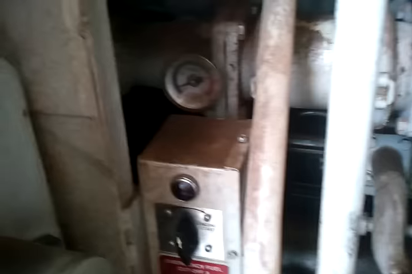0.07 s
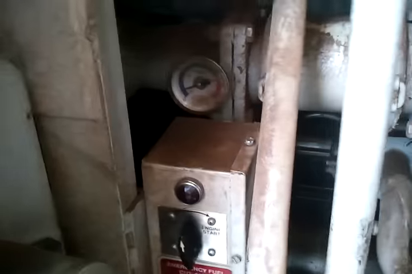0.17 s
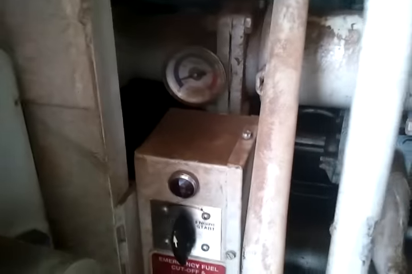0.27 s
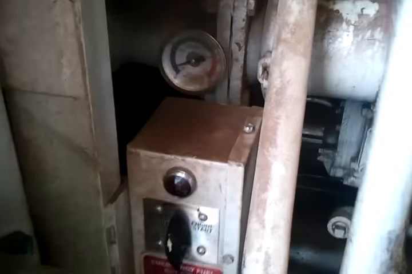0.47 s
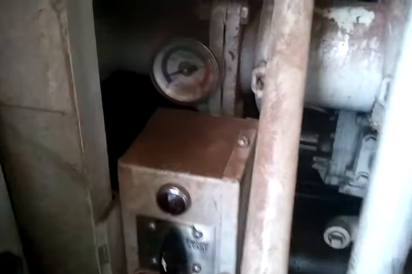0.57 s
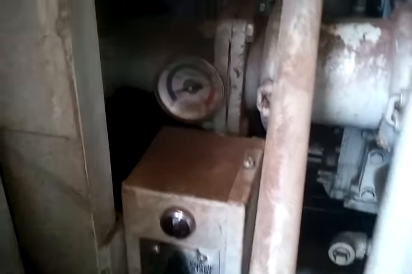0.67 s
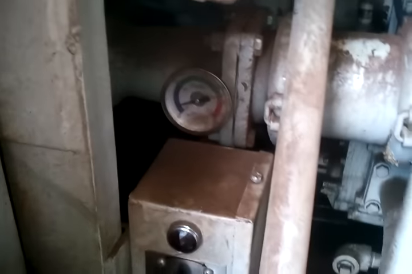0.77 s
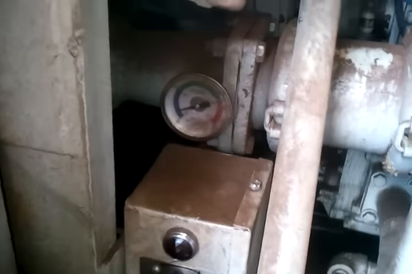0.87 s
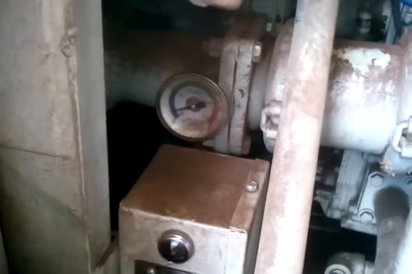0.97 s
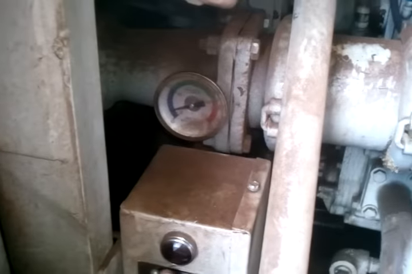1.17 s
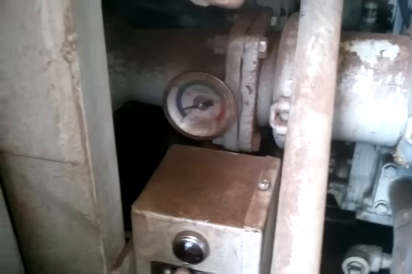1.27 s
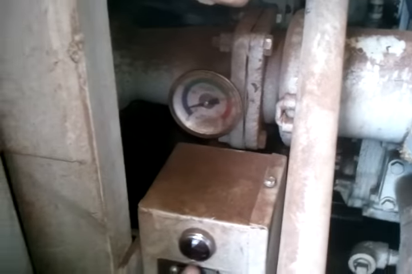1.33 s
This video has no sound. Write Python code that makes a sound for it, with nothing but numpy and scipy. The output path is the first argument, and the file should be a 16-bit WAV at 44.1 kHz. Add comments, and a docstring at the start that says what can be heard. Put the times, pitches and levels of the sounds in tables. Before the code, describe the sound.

After a brief silence, a diesel locomotive engine room throbs low with steady clatter and hiss; a dull thud, then a valve puff, quick ringing knocks and stronger air hiss, close mono microphone in a cramped metal compartment.

```python
"""A short silence, then the engine room of a diesel locomotive: diesel and a faster auxiliary shaft throb and beat
as sums of shaft orders, over rumble (coloured noise) and steady clatter and hiss (noise pulsing with the strokes,
ringing panels, faint whistles). A dull thud (decaying modes), then a valve snaps open with a puff (noise burst);
knocks ring the casing (decaying modes) and a stronger hiss builds up (noise through casing resonances).
Mono: both channels are equal."""
import sys
import numpy as np
from scipy import signal
from scipy.io import wavfile
from scipy.ndimage import uniform_filter1d

SR = 44100
rng = np.random.default_rng(int(sys.argv[2]) if len(sys.argv) > 2 else 0)


def elevation(decibels):
    """Turn decibel levels (scalar or array-like) into linear amplitude ratios."""
    levels = np.asarray(decibels, float)
    return 10 ** (levels / 20)


def dump_mix(stems):
    """Bounce the given channels to the path in sys.argv[1] as a 16-bit WAV at rate SR."""
    frames = np.atleast_2d(stems).T  # one column per channel
    limited = np.clip(frames, -1, 1)  # hard clip at full scale
    pcm = np.round(limited * 32767).astype(np.int16)
    wavfile.write(sys.argv[1], SR, pcm)


N = 128772  # samples

# mic input
OPEN_S, OPEN_RISE_S = .2043, .003

# diesel: cycle rate, moment of one firing
DIESEL_HZ, DIESEL_FIRES_S = 6.252, .0375
# diesel orders: (multiple of cycle rate [1], mean level [dB rms])
DIESEL_ORDERS = [(4, -59), (6, -58), (8, -33), (11, -59), (12, -55), (14, -57), (16, -38), (18, -55),
                 (22, -50), (24, -56), (28, -59), (32, -58), (33, -57), (61, -61)]
# auxiliary machine: shaft rate, moment of one stroke
AUX_HZ, AUX_STROKE_S = 15.894, .0027
# auxiliary orders: (multiple of shaft rate [1], mean level [dB rms])
AUX_ORDERS = [(2, -56), (3, -45), (5, -55), (6, -42), (7, -53), (8, -60), (9, -46), (10, -51), (11, -58),
              (12, -53), (13, -53), (14, -58), (16, -48), (19, -53), (20, -57), (21, -53), (23, -50),
              (24, -60), (26, -57), (27, -56), (44, -56), (47, -60), (50, -60), (56, -52), (58, -62),
              (60, -61), (62, -60), (78, -59), (87, -62), (92, -60), (93, -54), (96, -60), (100, -62),
              (107, -60), (108, -59), (111, -59), (114, -59), (116, -59), (119, -61), (122, -59)]
SCATTER_ABOVE_HZ = 150  # above this, orders arrive by many paths, in random phase
# unsteadiness of an order at 100 Hz, grows with pitch; top rate of the wavering
WAVER_AT_100HZ_DB, WANDER_AT_100HZ_RAD, WAVER_TOP_HZ = .9, .07, 5

# rumble spectrum shape: (frequency [Hz], relative density [dB per Hz])
RUMBLE_COLOUR = [(12, -30), (22, -4), (40, 2.5), (75, -7), (150, -0.5), (185, -7.5), (220, -3), (268, -9),
                 (285, -4), (340, -8.5), (395, -3.5), (435, -6.5), (470, -14), (600, -38)]
RUMBLE_DB = -43.5

# clatter spectrum shape: (frequency [Hz], relative density [dB per Hz])
CLATTER_COLOUR = [(260, -33), (450, -16.5), (536, -10), (585, -14.5), (680, -6.5), (841, -9.5), (904, -10),
                  (1050, -11.5), (1210, -8), (1360, -9.5), (1480, -4.5), (1660, -5.5), (1920, -2.5),
                  (2100, -4), (2280, -6.5), (2460, -12), (2890, -17.5), (3250, -15), (5320, -19.5),
                  (6240, -14), (7990, -19.5), (9650, -17.5), (11800, -23.5), (13500, -33), (14600, -42)]
# clatter pulsing with the strokes: (order of auxiliary shaft [1], depth [0-1])
STROKE_DEPTH = [(3, 0.09), (5, 0.02), (6, 0.09)]
# clatter noise before pulsing: (time [s], level below split [dB], level above split [dB])
CLATTER_LEVEL = [(.2, -35.5, -39.5), (.4, -37.5, -41), (.8, -36.5, -42), (1.1, -38, -42.5), (1.5, -37, -43),
                 (1.9, -37.5, -42.5), (2.9, -35.5, -42)]
SPLIT_HZ = 3000
TREBLE_STROKE_SHARE = 0.29  # of the depth below the split
# panel resonances: (frequency [Hz], width [Hz], level before PANEL_GAIN [dB])
PANEL_MODES = [(1652, 16, -53), (1812, 12, -51), (1905, 14, -51), (1952, 10, -49), (2210, 14, -53),
               (2313, 12, -53)]
# gain of the ringing panels: (time [s], gain [dB])
PANEL_GAIN = [(.2, -0.5), (.5, 2), (.9, 2.5), (1.3, -0.5), (1.9, -0.5), (2.9, -7)]
# faint treble whistles: (frequency [Hz], width [Hz], level re WHISTLE_DB [dB])
WHISTLES = [(3264, 210, -2), (6100, 51, 1), (6630, 150, 5.5), (8200, 50, -7.5), (8550, 220, -13)]
WHISTLE_DB = -57.5

THUD_S, THUD_RISE_S = 1.525, 0.022
# thud modes: (frequency [Hz], amplitude before rise and decay [dB], t60 [s])
THUD_MODES = [(153, -34.5, .5), (212, -35, 0.44), (315, -36.5, 0.33), (379, -35.5, .5)]

PUFF_S, PUFF_RISE_S, PUFF_T60_S, PUFF_DB = 1.989, .006, .11, -35.5
PUFF_HOLD_S = .022  # start to decay, rise included
# puff spectrum shape: (frequency [Hz], relative density [dB per Hz])
PUFF_COLOUR = [(2500, -30), (3300, -8), (3900, 2.5), (4600, -7), (5500, 3), (7500, -3), (9000, -3),
               (10500, -10), (11800, 3), (13000, -12), (14000, -30)]

# knocks: (time [s], level before KNOCK_GAIN_DB [dB])
KNOCKS = [(1.999, -24), (2.1394, -21), (2.2398, -32), (2.3294, -18.5), (2.419, -31), (2.5077, -21.5),
          (2.5641, -24.5), (2.6234, -21), (2.6853, -20), (2.77, -18), (2.8492, -23), (2.8994, -22)]
KNOCK_RISE_S, KNOCK_T60_S = 0.0085, 0.2  # rise is a time constant
KNOCK_SPREAD_DB, KNOCK_GAIN_DB = 3.5, -7.5
# casing resonances: (frequency [Hz], width [Hz], relative level [dB])
CASING_MODES = [(1335, 12, -14), (1599, 14, -10), (1701, 14, -11), (1830, 10, -5), (2073, 12, -10),
                (2095, 12, -9), (2191, 12, -6), (2638, 12, -16)]

# air hiss spectrum shape: (frequency [Hz], relative density [dB per Hz])
AIR_COLOUR = [(250, -40), (400, -3), (700, -17), (1250, -10), (2100, -9), (2600, -9), (3300, -4),
              (4500, -7.5), (6000, -4), (8000, -9.5), (10000, -9), (12700, -25), (14500, -38)]
# air hiss without casing: (time [s], level [dB])
AIR_LEVEL = [(2.04, -62), (2.11, -46), (2.15, -38), (2.22, -40), (2.4, -39), (2.6, -38), (2.75, -38),
             (2.92, -39)]
AIR_CASING_GAIN_DB = -2.5


def evened(x):
    """Scales to rms 1."""
    return x / np.sqrt(np.mean(x ** 2) + 1e-20)


def slow(top_hz):
    """Slow random wave of rms 1: sines of random phase up to top_hz."""
    t = np.arange(0, N + 256, 256) / SR
    wave = np.zeros(len(t))
    for hz in top_hz * np.geomspace(.08, 1, num=12):
        wave += np.sin(2 * np.pi * (hz * t + rng.random())) / np.sqrt(hz)
    return np.interp(np.arange(N) / SR, t, evened(wave))


def noise(colour, patch_db, band_db, flicker_db):
    """Coloured noise of rms 1 with broad short patches, narrow lasting bands and a shared flicker."""
    frames, hz = N // 256 + 5, np.fft.rfftfreq(1024, 1 / SR)
    # arrays are (frequency bin, frame)
    real, imag, p, q = rng.standard_normal((frames, len(hz), 4)).T
    patches = evened(uniform_filter1d(uniform_filter1d(p, size=12, axis=0), size=10, axis=1))
    bands = evened(uniform_filter1d(uniform_filter1d(q, size=2, axis=0), size=50, axis=1))
    flicker = evened(uniform_filter1d(rng.standard_normal(frames), size=8))
    colour_hz, colour_db = np.transpose(colour)
    shape_db = np.interp(np.log(hz + 1), np.log(colour_hz + 1), colour_db, left=-90, right=-90)[:, None]
    level_db = shape_db + patch_db * patches + band_db * bands + flicker_db * flicker
    spectrum = (real + 1j * imag) * elevation(level_db)
    return evened(signal.istft(spectrum, nperseg=1024, noverlap=768)[1][:N])


def ringing(modes, waver_db):
    """Noise through narrow resonances, each swelling and fading on its own by waver_db rms."""
    out, t = np.zeros(N), np.arange(N) / SR
    for hz, width_hz, db in modes:
        pole = np.exp(-np.pi * width_hz / SR)
        white = rng.standard_normal(N) + 1j * rng.standard_normal(N)
        low = signal.lfilter([1 - pole], [1, -pole], white)
        band = evened((low * np.exp(2j * np.pi * hz * t)).real)  # shifted up to hz
        out += elevation(db + waver_db * slow(4.08)) * band
    return out


def shaft(rate_hz, stroke_s, orders):
    """Suction pulses of a turning shaft as a sum of slightly wavering orders."""
    turns = rate_hz * (np.arange(N) / SR - stroke_s)
    out = np.zeros(N)
    for order, db in orders:
        order_hz = order * rate_hz
        loose = np.sqrt(order_hz / 100)
        scatter = 2 * np.pi * rng.random() * (order_hz > SCATTER_ABOVE_HZ)
        phase = scatter + WANDER_AT_100HZ_RAD * loose * slow(WAVER_TOP_HZ)
        level = elevation(db + WAVER_AT_100HZ_DB * min(loose, 2) * slow(WAVER_TOP_HZ))
        out -= np.sqrt(2) * level * np.cos(2 * np.pi * order * turns + phase)
    return out


def rumble():
    """Low coloured noise of flickering level."""
    return elevation(RUMBLE_DB) * noise(RUMBLE_COLOUR, patch_db=0.5, band_db=1.0, flicker_db=2.5)


def clatter():
    """Valve gear, gears and fans: broad noise pulsing with the strokes, ringing panels, faint whistles."""
    t = np.arange(N) / SR
    beat = np.zeros(N)
    for order, depth in STROKE_DEPTH:
        beat += depth * np.cos(2 * np.pi * (order * AUX_HZ * t + rng.random()))
    level_s, low_db, high_db = np.transpose(CLATTER_LEVEL)
    panels = elevation(np.interp(t, *np.transpose(PANEL_GAIN))) * ringing(PANEL_MODES, waver_db=1.5)
    body = noise(CLATTER_COLOUR, patch_db=0.7, band_db=1.0, flicker_db=.5)
    low = signal.oaconvolve(body, signal.firwin(255, SPLIT_HZ, fs=SR), "same")
    low_part = elevation(np.interp(t, level_s, low_db)) * evened(low)
    high_part = elevation(np.interp(t, level_s, high_db)) * evened(body - low)
    out = (1 + beat) * (low_part + panels)
    out += (1 + TREBLE_STROKE_SHARE * beat) * high_part
    return out + elevation(WHISTLE_DB) * ringing(WHISTLES, waver_db=0)


def thud():
    """One dull bump on a panel: decaying modes under a linear rise."""
    t = np.clip(np.arange(N) / SR - THUD_S, 0, None)
    ring = sum(elevation(db - 60 * t / t60_s) * np.sin(2 * np.pi * hz * t) for hz, db, t60_s in THUD_MODES)
    return np.minimum(t / THUD_RISE_S, 1) * ring


def puff():
    """Short noise burst as the valve snaps open: rise, hold, exponential decay."""
    t = np.arange(N) / SR - PUFF_S
    rise = np.clip(t / PUFF_RISE_S, 0, 1)
    decay = elevation(-60 * np.clip(t - PUFF_HOLD_S, 0, 1) / PUFF_T60_S)
    return elevation(PUFF_DB) * rise * decay * noise(PUFF_COLOUR, patch_db=1, band_db=2, flicker_db=0)


def knocks():
    """Each knock rings the casing modes in its own mix, slightly detuned."""
    out, t = np.zeros(N + SR), np.arange(SR // 4) / SR
    hz, _, mode_db = np.transpose(CASING_MODES)
    luck = rng.standard_normal((len(KNOCKS), 3, len(hz)))
    shape = (1 - np.exp(-t / KNOCK_RISE_S)) * elevation(-60 * t / KNOCK_T60_S)
    for (start_s, db), (mix, detune, phase) in zip(KNOCKS, luck):
        cycles = np.outer(hz * (1 + 0.0044 * detune), t) + phase[:, None]
        ring = elevation(mode_db + KNOCK_SPREAD_DB * mix) @ np.sin(2 * np.pi * cycles)
        out[round(start_s * SR):][:len(t)] += elevation(db + KNOCK_GAIN_DB) * shape * evened(ring)
    return out[:N]


def air():
    """Hiss that builds up after the valve opens and rings the casing."""
    level_s, level_db = np.transpose(AIR_LEVEL)
    hiss = noise(AIR_COLOUR, patch_db=.6, band_db=1.5, flicker_db=.6)
    casing = elevation(AIR_CASING_GAIN_DB) * ringing(CASING_MODES, waver_db=2.0)
    level = elevation(np.interp(np.arange(N) / SR, level_s, level_db, left=-120))
    return level * (hiss + casing)


def scene():
    """All sources at one microphone, on two equal channels."""
    mono = shaft(DIESEL_HZ, DIESEL_FIRES_S, DIESEL_ORDERS)
    mono += shaft(AUX_HZ, AUX_STROKE_S, AUX_ORDERS)
    mono += rumble() + clatter() + thud() + puff() + knocks() + air()
    return np.array([mono, mono])


def low_pass(x):
    """Removes everything above the highest recorded frequency."""
    return signal.sosfilt(signal.butter(12, 14990, fs=SR, output="sos"), x)


def record(dry):
    """The input opens after a silence, by a short linear ramp."""
    opening = np.clip((np.arange(N) / SR - OPEN_S) / OPEN_RISE_S, 0, 1)
    return low_pass(dry * opening)


dry = scene()
out = record(dry)
dump_mix(out)
```